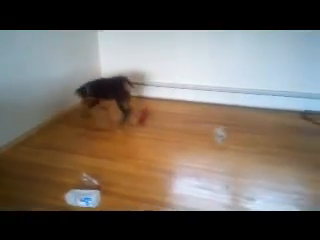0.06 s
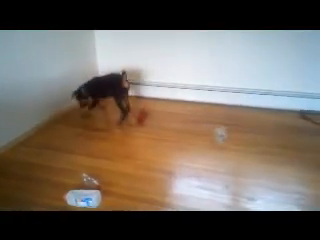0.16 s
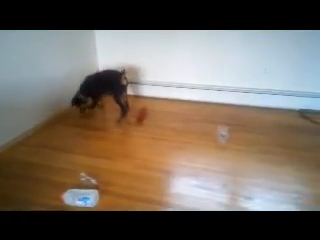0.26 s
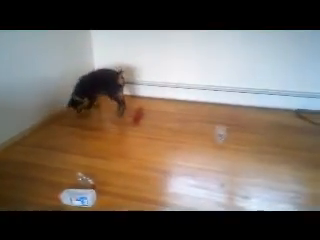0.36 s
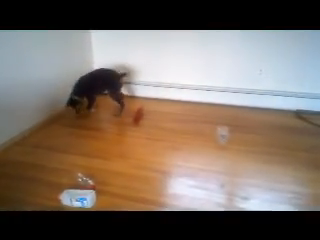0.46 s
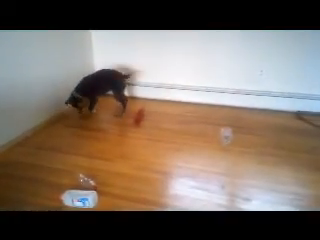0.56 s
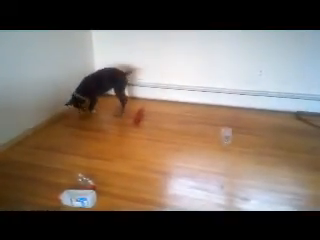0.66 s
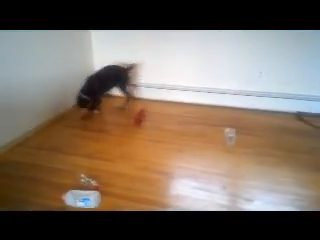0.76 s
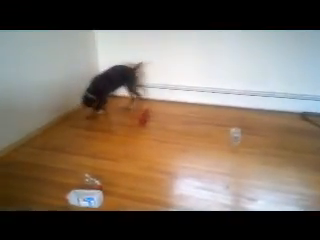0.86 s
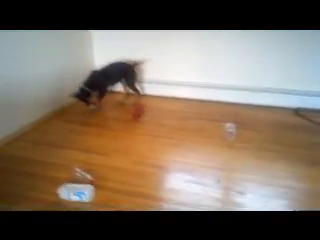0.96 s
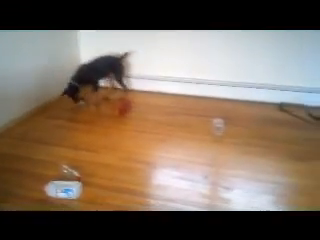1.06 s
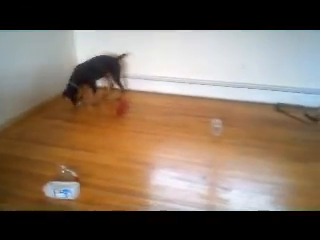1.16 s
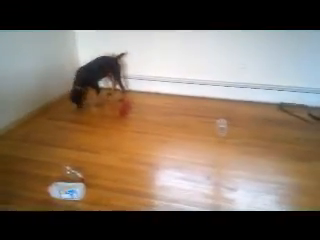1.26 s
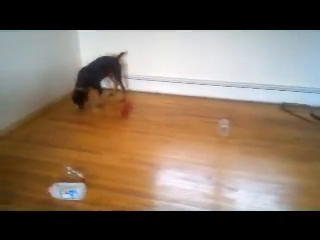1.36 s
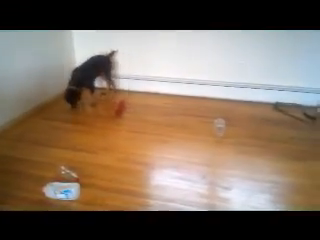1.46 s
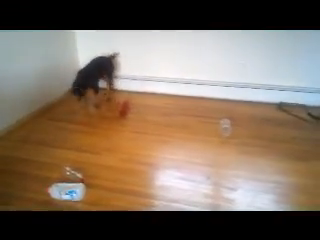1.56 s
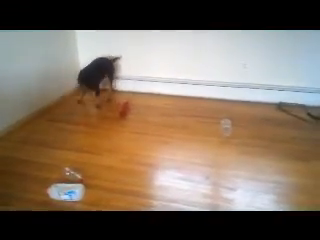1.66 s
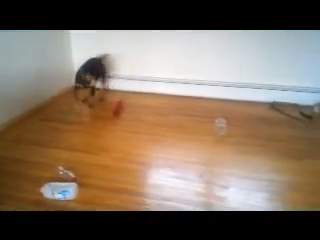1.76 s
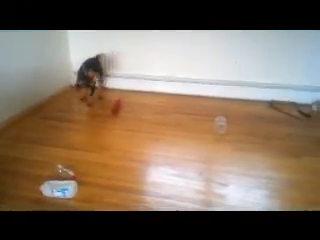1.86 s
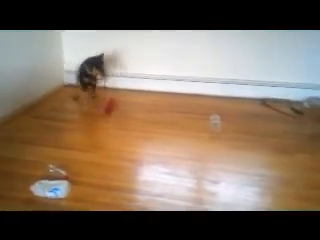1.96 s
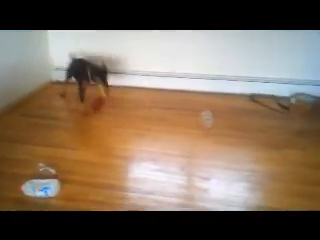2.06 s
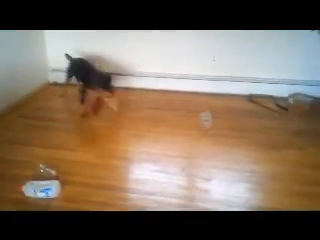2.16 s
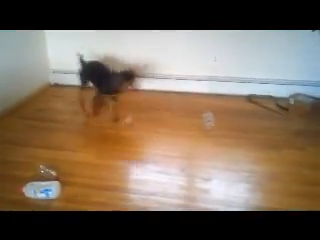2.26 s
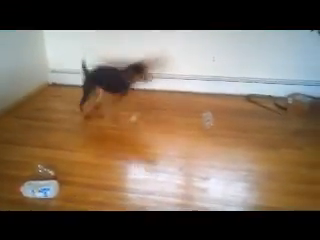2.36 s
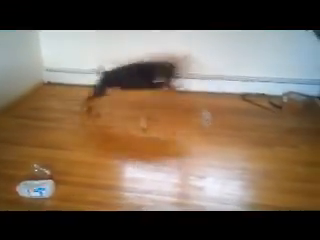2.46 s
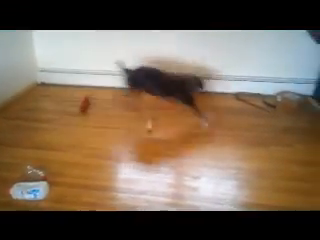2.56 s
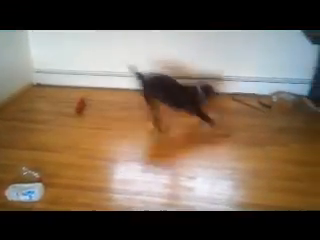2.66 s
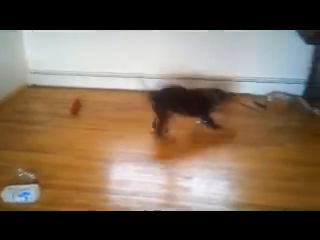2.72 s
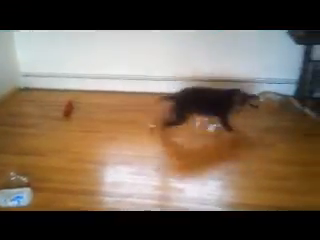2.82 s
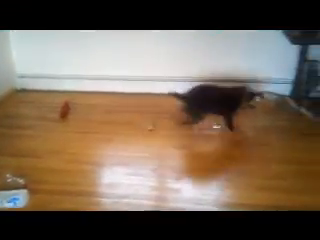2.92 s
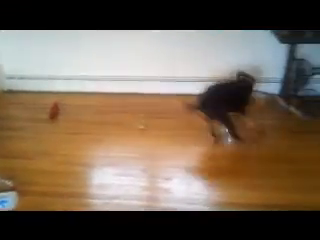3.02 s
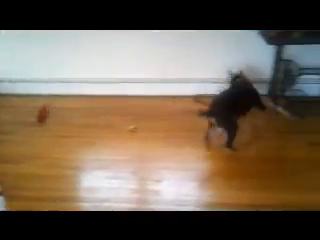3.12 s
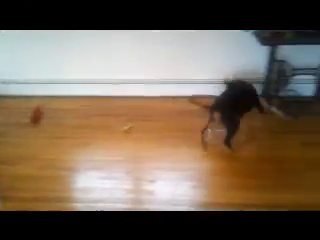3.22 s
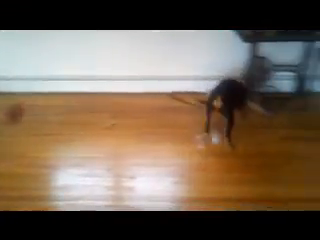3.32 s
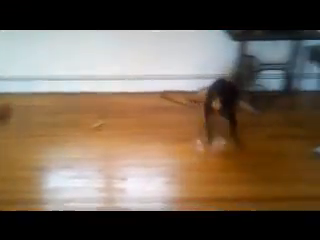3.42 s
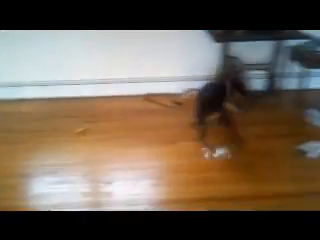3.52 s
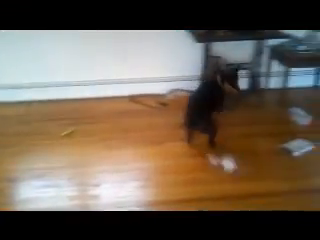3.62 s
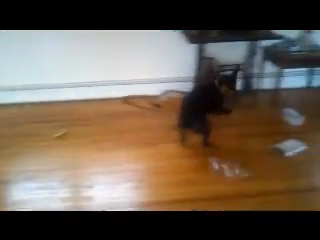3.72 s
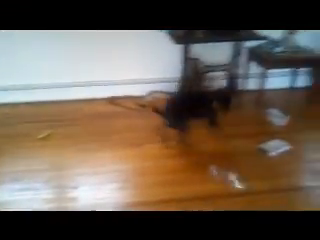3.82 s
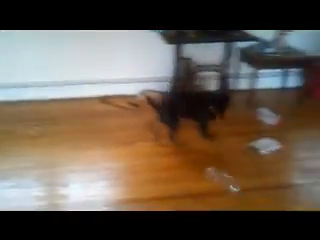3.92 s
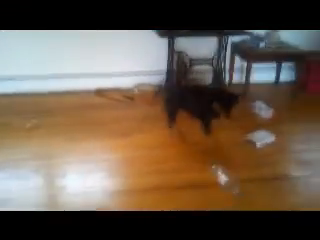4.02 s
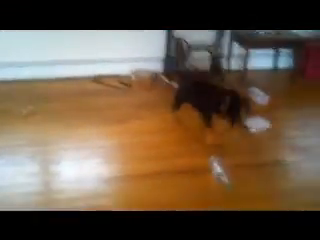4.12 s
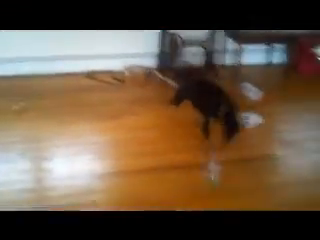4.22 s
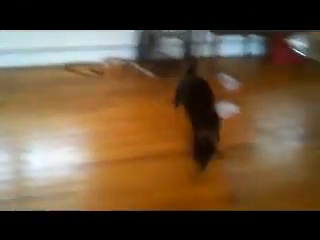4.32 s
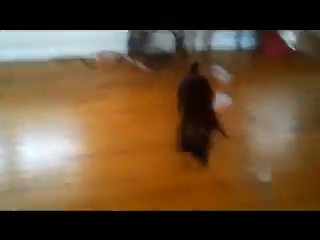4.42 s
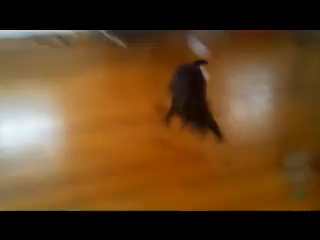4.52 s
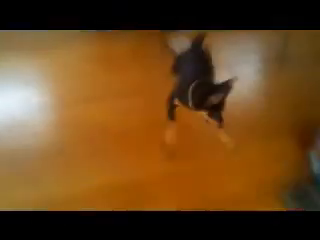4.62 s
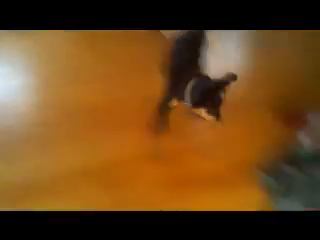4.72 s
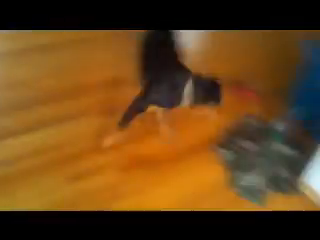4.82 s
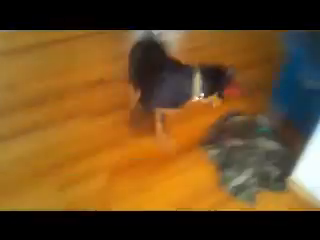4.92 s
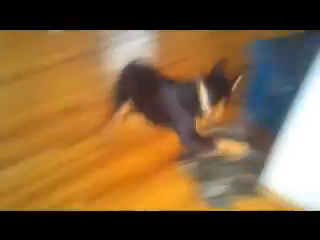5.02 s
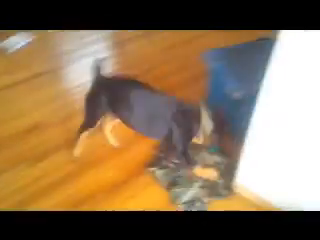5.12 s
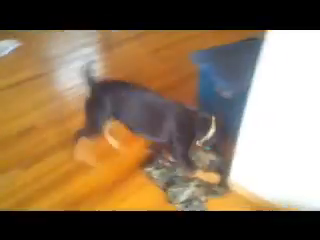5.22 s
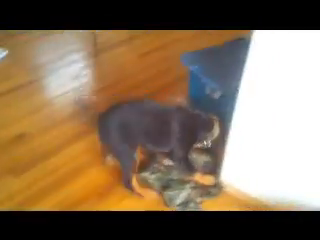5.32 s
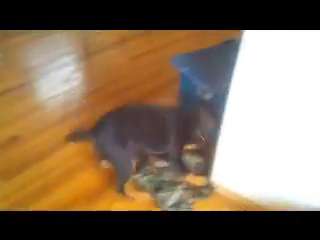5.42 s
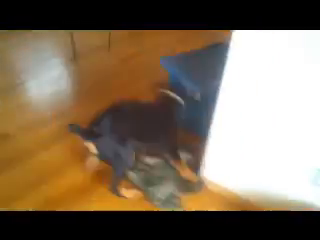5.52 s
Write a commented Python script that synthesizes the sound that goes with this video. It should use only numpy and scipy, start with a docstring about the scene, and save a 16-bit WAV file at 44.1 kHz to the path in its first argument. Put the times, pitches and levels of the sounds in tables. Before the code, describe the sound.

Soft paw thuds and slides on boards, a lull, then hard clattering landings, ringing plastic knocks and a last close burst in an empty room.

```python
"""A puppy scuffles and gallops over a wooden floor in a bare, echoing room, with faint steady air throughout.
It starts with a quick run of paws, slides and shuffles: soft pads thud, claws tick and the boards boom.
After a quieter stretch, heavier landings from 2.3 s bring bright snaps of claws and thin plastic.
From 2.7 s a hollow plastic toy is knocked and rings; after a lull, from 4.2 s, the puppy comes nearer
for a last burst. Contacts are shaped pulses and noise; boards and toy are dying sine waves."""
import sys
import numpy as np
from scipy import signal
from scipy.fft import rfft, irfft, next_fast_len
from scipy.io import wavfile

SR = 44100
rng = np.random.default_rng(int(sys.argv[2]) if len(sys.argv) > 2 else 0)


def store_pcm(level_fs):
    """Save levels as 16-bit WAV."""
    pcm = np.round(np.clip(level_fs, -1, 1) * 32767).astype(np.int16)
    wavfile.write(sys.argv[1], SR, np.atleast_2d(pcm).T)


N = 246078  # samples
TAPS = 4096  # length of one short pulse, samples
HZ = np.fft.rfftfreq(TAPS, 1 / SR)


def amp(db):
    """Turns decibels into a gain."""
    return 10 ** (np.asarray(db) / 20)


def read(points, hz):
    """Reads a table joined by straight lines over log frequency."""
    f, value = np.transpose(points)
    return np.interp(np.log(hz + 1), np.log(f + 1), value)


def unit(x):
    """Scales a sound to energy 1."""
    return x / np.sqrt(np.sum(x ** 2) + 1e-20)


def add(mix, t, sound):
    """Mixes a sound in at time t, in seconds; a time before 0 counts as 0."""
    start = max(round(t * SR), 0)
    part = mix[start:][:len(sound)]
    part += sound[:len(part)]


# Tone colour of the room's air: f/Hz, relative level/dB
AIR_COLOUR = [(30, -48), (80, 11), (170, 6), (400, 4), (1200, -2.5), (2200, -9), (5000, -20), (9000, -9),
              (11500, -22.5)]


def hush():
    """The faint steady air of the room: coloured noise, nearly separate on the two sides."""
    level_db = -60.5
    spectrum = rfft(rng.standard_normal((2, N)))
    noise = irfft(spectrum * amp(read(AIR_COLOUR, np.fft.rfftfreq(N, 1 / SR))), N)
    return amp(level_db) * np.sqrt(2 * N) * unit(noise + 0.026 * noise[::-1])


# The puppy comes nearer: t/s, gain of the straight path
NEARNESS = [(4.2, 0.61), (4.9, 0.71), (5.25, 0.83)]


def straight_path(x):
    """Sound that arrives without echoes grows as the puppy comes nearer."""
    return x * np.interp(np.arange(N) / SR, *np.transpose(NEARNESS))


# Time in which the echoes die by 60 dB: f/Hz, time/s
ECHO_FADE = [(100, 0.25), (260, 0.73), (700, 0.84), (1800, 0.9), (4500, 0.65), (10000, 0.49)]
# How alike the echoes are at the two microphones: f/Hz, correlation
MIC_LIKENESS = [(100, 0.78), (300, 0.87), (600, 0.72), (1500, 0), (3000, 0), (10000, 0.13)]


def room(x, direct, wet, early=0.45, early_fade=0.028):
    """The straight path, then dense echoes off bare walls, at both microphones."""
    t = np.arange(SR) / SR
    density = np.minimum(1500 + 120000 * t, SR) / SR  # echoes crowd together with time
    present = rng.random((2, SR)) < density
    taps = rng.standard_normal((2, SR)) * present / np.sqrt(density)
    hz, at, z = signal.stft(taps, SR, nperseg=256)
    like = np.clip(read(MIC_LIKENESS, hz), -1, 1)[:, None]
    z[1] = like * z[0] + np.sqrt(1 - like ** 2) * z[1]
    fade = amp(-60 * at / read(ECHO_FADE, hz)[:, None])
    tail = signal.istft(z * fade, SR, nperseg=256)[1][:, :SR]
    tail *= (1 - np.exp(-t / 0.0011)) * (1 + early * np.exp(-t / early_fade))  # stronger early echoes
    response = wet * np.sqrt(2) * unit(tail)
    response[0, 0] += direct
    response[1, 1] += direct
    return signal.fftconvolve(x[None], response, axes=1)[:, :N]


def pulse(db):
    """The shortest pulse with this spectrum that starts at once, scaled to energy 1."""
    log_gain = np.log(amp(np.maximum(db - db.max(), -90)))
    circle = np.concatenate([log_gain, log_gain[-2:0:-1]])
    # the Hilbert transform gives the phase that packs the energy at the start
    return unit(np.fft.ifft(np.exp(np.conj(signal.hilbert(circle)))).real)


def hump(centre_hz, steep_db):
    """Favours one frequency: others drop with the square of their distance in octaves, up to 2."""
    return -steep_db * np.minimum(np.log2((HZ + 1) / centre_hz) ** 2, 4)


def contact(force_db, hardness):
    """Hardness moves energy from thud to clack: 0 is a soft pad, 1 a bare claw or toy."""
    soft = np.array((0, -9.5))  # thud and clack, dB re force
    hard = np.array((-10.5, 0.71))
    return force_db + soft + hardness * (hard - soft)


# Tone colours of the three parts of a contact: f/Hz, relative level/dB
THUD = [(30, -45.5), (60, -9.5), (110, -5), (170, 0), (250, -4), (380, -5.5), (500, -16.5), (900, -17),
        (3000, -100)]
CLACK = [(100, -67.5), (350, 7.5), (550, 5.5), (850, 2), (1250, 0), (1700, -2), (2200, -6), (2800, -11.5),
         (4500, -19.5), (10000, -123)]
TICK = [(500, -66), (2200, 6.5), (3200, 6), (4200, 3), (5200, -2), (6700, 4), (8000, 6.5), (9400, 2),
        (10500, -1.5), (11800, -26.5)]


def scuff(length, rumble_db, scrape_db, hiss_db):
    """A slide is a swell of small uneven slips, clumped as the paw grips and lets go."""
    count = int(max(length, .01) * 1.263 * SR)
    t = np.arange(count) / SR
    grip_db = 2.8 * np.interp(t / 0.009, np.arange(200), rng.standard_normal(200))  # new grip each 9 ms
    swell = np.hanning(count) * amp(grip_db)
    rumble = read(THUD, HZ) + hump(282, steep_db=1.5)
    layers = (rumble, rumble_db), (read(CLACK, HZ), scrape_db), (read(TICK, HZ), hiss_db)
    parts = []
    for colour, db in layers:
        size = rng.standard_normal(count)
        slipping = rng.random(count) < 550 / SR  # 550 slips a second on average
        slips = size * slipping * swell
        parts.append(amp(db) * signal.fftconvolve(unit(slips), pulse(colour)))
    return sum(parts) * np.sqrt(length * SR)


def slide(t, length, force_db, hardness, claws_db):
    """Drags a contact over the boards; gives its start in seconds and its sound."""
    rumble_db, scrape_db = contact(force_db, np.clip(hardness, 0, 1))
    return t - .8 * length, scuff(length, rumble_db, scrape_db, force_db + claws_db)


# Listed slides of paws and toys, each starting 0.8 lengths before t and lasting 1.263 lengths: # t/s, length/s,
# force level/dB, hardness (0-1), claws level/dB re force
SLIDES = [(0.035, 0.075, -30.5, 0.18, -17.5), (0.379, 0.16, -36.5, 0, -43), (0.863, .11, -56, 0, -28),
          (1.36, 0.14, -51.5, 0.59, -29), (1.479, .11, -52, 0.08, -13), (1.721, 0.087, -61.5, 0.97, -27),
          (2.211, 0.054, -44.5, 0.4, -7.5), (2.669, 0.07, -30, 0.83, -4), (2.735, 0.055, -23.5, 1, -14.5),
          (2.827, 0.098, -28.5, 0.36, -13), (3.077, 0.085, -31.5, 1, -5), (3.42, 0.1, -38.5, 0.4, -9.5),
          (3.914, 0.087, -42, 0.26, -10.5), (4.019, 0.074, -40.5, 0.63, -6),
          (4.364, 0.079, -29, 0.06, -5.5), (4.861, .07, -31, 0.14, -15), (5.221, 0.068, -27, 0.8, -13.5)]


def slides():
    """Paws and toys rub over the wood in the listed slides."""
    for row in SLIDES:
        yield slide(*row)


# How strongly the paws shuffle in between: t/s, force level/dB
SHUFFLE = [(0, -60), (.55, -41.5), (.72, -58.5), (1.2, -62.5), (1.4, -63), (2.15, -79), (2.26, -52),
           (2.9, -43), (3.55, -42.5), (3.8, -56.5), (4.25, -48.5), (4.55, -38), (4.75, -48.5), (5.5, -59)]


def shuffling(count=70):
    """Small slides of chance timing and strength, spread over the whole play."""
    step = N / SR / count
    for k, (late, loud) in enumerate(rng.standard_normal((count, 2))):
        t = step * (k + .5 + .15 * late)
        force_db = np.interp(t, *np.transpose(SHUFFLE)) - 4.5 * loud
        yield slide(t, .08, force_db, hardness=0.13, claws_db=-6.5)


def chatter(share, fade):
    """One blow followed by a quickly dying rattle of tiny contacts; fade is in seconds."""
    t = np.arange(TAPS) / SR
    force = share * unit(rng.standard_normal(TAPS) ** 3 * np.exp(-t / fade))
    force[0] += 1
    return unit(force)


def strike(thud_db, thud_hz, clack_db, clack_hz, tick_db):
    """The weight thuds, the hard surface clacks, and the claws tick, all at the same moment."""
    thud = amp(thud_db - 1.5) * pulse(read(THUD, HZ) + hump(thud_hz, steep_db=11.5))
    clack = amp(clack_db - 4.5) * pulse(read(CLACK, HZ) + hump(clack_hz, steep_db=3.5))
    tick = amp(tick_db - 4.5) * pulse(read(TICK, HZ))
    body = signal.fftconvolve(thud + clack, chatter(share=0.79, fade=0.0084))
    return body + signal.fftconvolve(tick, chatter(share=0.91, fade=0.0015))


def landing(force_db, hardness, claws_db, thud_hz):
    """A paw comes down; the harder the contact, the higher it clacks."""
    hard = np.clip(hardness, 0, 1)
    thud_db, clack_db = contact(force_db, hard)
    clack_hz = 570 * 2 ** (1.85 * hard)  # up to 1.85 octaves higher
    return amp(33.5) * strike(thud_db, thud_hz, clack_db, clack_hz, force_db + claws_db)


# Landings on the boards, before a common gain:
# t/s, force level/dB, hardness (0-1), claws level/dB re force, favoured thud f/Hz
LANDINGS = [(0.003, -28, 0.52, -12, 326), (0.074, -23, 0.45, -37, 342), (0.146, -25.5, 0, -40, 360),
            (0.288, -19, 0.48, -25.5, 350), (0.418, -28, 0, -31, 358), (0.605, -36.5, 0.2, -19, 320),
            (1.378, -43.5, 0, -17, 308), (1.426, -41, 0, -17, 234), (2.138, -35, 0.32, -19, 230),
            (2.313, -13.5, 0.78, -10, 340), (2.321, -20, 0.37, -30, 280), (2.543, -24.5, 0.72, -4.5, 315),
            (2.68, -16.5, 0.74, -9, 255.7), (2.711, -21, 0.82, -15.5, 273), (3.0002, -18.5, 0.46, -21, 340),
            (3.122, -19.5, 0.56, -7, 292), (3.272, -19, 0.98, -26, 397), (3.903, -38, 0.52, -29, 333),
            (4.189, -38.5, 0.31, -11.5, 220), (4.328, -24, 0.62, -8.5, 221), (4.364, -23.5, 1, -18, 275),
            (4.384, -28.5, 0.83, -7.5, 278), (4.79, -30.5, 0.3, -9.5, 330), (4.9222, -19.5, 0.43, -25, 265),
            (5.177, -17.5, 0.42, -19, 222), (5.263, -32, 0.6, 14.5, 220)]


def landings():
    """Paws strike the wood in quick runs; gives each time in seconds and its sound."""
    for t, *row in LANDINGS:
        yield t, landing(*row)


def floor_play(count=5):
    """Contacts take turns at several spots of the floor, each spot with its own echoes."""
    sounds = [*landings(), *slides(), *shuffling()]
    spots = np.zeros((count, N))
    for k, (t, sound) in enumerate(sounds):
        add(spots[k % count], t, sound)
    return sum(0.56 * straight_path(spot) + room(spot, direct=0, wet=0.89) for spot in spots)


def ringing(modes, knocks, direct, wet, build, flex, focus_db):
    """Each knock rings the same modes, slightly detuned by flexing, from a new spot in the room.

    Modes build up over a share of their ring time, and weaken by focus_db an octave from the favoured pitch.
    """
    t, out = np.arange(SR) / SR, np.zeros((2, N))
    hz, db, t60 = np.transpose(modes)[:, :, None]
    envelope = (1 - np.exp(-t / (build * t60))) * amp(-60 * t / t60)
    for knock_t, level_db, favoured_hz in knocks:
        height = unit(amp(db - focus_db * abs(np.log2(hz / favoured_hz))))
        bent_hz = hz * (1 + flex * rng.uniform(-1.046, 1, hz.shape))
        ring = np.sum(height * envelope * np.sin(2 * np.pi * bent_hz * t), axis=0)
        for mix, heard in zip(out, room(ring, direct, wet)):
            add(mix, knock_t, amp(level_db) * heard)
    return out


# Ways the boards boom, before flexing: f/Hz, relative level/dB, time to die by 60 dB/s
BOARD_MODES = [(196, -4, 0.11), (268, -8, 0.1), (299.5, -8, 0.15), (343, -8, 0.2), (387, -8, 0.5)]
# Steps that set the boards booming: t/s, level/dB, f/Hz that this spot favours
BOARD_KNOCKS = [(0.074, -20, 335), (0.118, -23, 343), (0.178, -21, 343), (0.292, -22, 335),
                (0.41, -26, 350), (0.458, -23, 335), (0.83, -35, 350), (0.908, -36, 320),
                (1.424, -27.5, 290), (2.346, -8, 295), (2.575, -19, 220), (2.676, -6, 255),
                (2.84, -10.5, 400), (3.14, -7, 405), (3.425, -22, 390), (4.79, -24, 320), (4.828, -19, 265),
                (4.924, -18, 215), (4.972, -15, 240), (5.178, -6, 190), (5.204, -7, 225), (5.24, -10, 190)]


def boards():
    """The boards boom under the puppy's weight; they radiate little deep bass."""
    boom = ringing(BOARD_MODES, BOARD_KNOCKS, direct=.5, wet=.2, build=.04, flex=.012, focus_db=55)
    low_cut = signal.butter(3, 150, "highpass", fs=SR, output="sos")
    return signal.sosfilt(low_cut, boom)


def snap(db, centre_hz, rattle, knock_db):
    """A hard, bright click over the short knock of the thing that is hit."""
    click = pulse(read(TICK, HZ) + hump(centre_hz, steep_db=8))
    knock = amp(knock_db) * pulse(read(CLACK, HZ) + hump(1820, steep_db=3.5))
    return amp(db) * signal.fftconvolve(click + knock, chatter(share=3.2, fade=max(rattle, .0003)))


# Sharp snaps of claws and thin plastic, before a common gain:
# t/s, level/dB, centre f/Hz, rattle fade/s, hollow knock level/dB re click
SNAPS = [(2.315, -32, 14500, 0.0048, -10), (2.568, -30, 9200, 0.011, -25), (2.677, -31, 7540, 0.0021, 1.5),
         (2.712, -28.5, 4180, 0.0025, -5), (3.1232, -26, 7160, 0.0019, -14),
         (3.137, -24.5, 4650, 0.0011, -18), (3.273, -34, 2950, 0.0016, 13.5),
         (3.978, -42, 5160, 0.0029, 3.5), (4.288, -46, 6560, 0.0059, 1), (4.3144, -37, 6400, 0.0022, 0.5),
         (4.364, -33, 4600, 0.0034, 4), (4.78, -41, 7900, 0.0069, -4), (4.922, -37, 3500, 0.00045, -2),
         (5.164, -41, 5960, 0.0044, 4), (5.203, -31, 3850, 0.0023, -8), (5.2632, -17, 6300, 0.00092, -6),
         (5.2829, -20.5, 7000, 0.00074, -8)]


def snaps():
    """Bright clicks arrive more directly than the thuds."""
    out = np.zeros(N)
    for t, *click in SNAPS:
        add(out, t, amp(27.0) * snap(*click))
    return straight_path(out) + room(out, direct=0, wet=1.0)


# Ways the hollow plastic toy rings, before flexing: f/Hz, relative level/dB, time to die by 60 dB/s
TOY_MODES = [(727, -11, .28), (808, -3.5, .32), (838, -6, .16), (853, -8, .4), (869, -2, .42),
             (890, -6, .2), (1220, -12.5, .38), (1545, -19, .25), (1630, -15, .25), (1771, -15.5, .45),
             (1956, -16, .14), (2050, -14, .3)]
# Knocks that set the toy ringing: t/s, level/dB, f/Hz that the blow favours
TOY_KNOCKS = [(2.686, -19, 1800), (2.703, -20, 1600), (2.738, -18, 1050), (2.8107, -20, 900),
              (3.0, -22, 1150), (3.088, -24, 900), (3.273, -13, 1600), (3.2935, -15.5, 1100),
              (3.3131, -14.5, 900), (3.375, -25, 950), (4.364, -20, 1600), (4.3852, -26, 1150),
              (4.946, -27, 1100), (5.2995, -12.5, 1100), (5.326, -19, 1250), (5.342, -17, 1000),
              (5.4, -25, 950)]


def toy():
    """A hollow plastic toy is knocked, and its walls ring on in the room."""
    return ringing(TOY_MODES, TOY_KNOCKS, direct=.85, wet=.5, build=.002, flex=.009, focus_db=11)


def scene():
    """Adds up everything at the two microphones."""
    return hush() + floor_play() + boards() + snaps() + toy()


# How much of the other side each side subtracts: f/Hz, share (0-1)
CROSSFEED = [(200, 0.42), (600, 0.29), (1200, 0.8), (2600, 1), (5200, 0.3), (10000, 0.33)]


def record(dry):
    """Two close microphones: each side subtracts a delayed share of the other to widen the picture."""
    size = next_fast_len(N + TAPS)
    hz, z = np.fft.rfftfreq(size, 1 / SR), rfft(dry, size)
    delay = 1 / 2630  # s
    share = np.clip(read(CROSSFEED, hz), 0, 1)
    other_side = share * np.exp(-2j * np.pi * hz * delay) * z[::-1]
    wide = irfft((z - other_side) / np.sqrt(1 + share ** 2), size)[:, :N]
    overloaded = np.clip(wide, -.85, .85)  # the loudest peaks are cut flat
    low_pass = signal.firwin(255, 11900, window=("kaiser", 8), fs=SR)  # removes the top treble
    return signal.oaconvolve(overloaded, low_pass[None], "same")


dry = scene()
out = record(dry)
store_pcm(out)
```